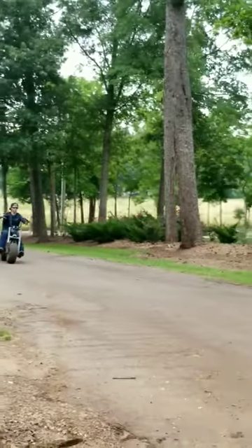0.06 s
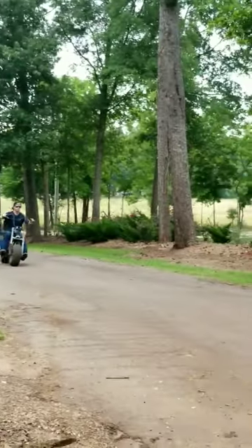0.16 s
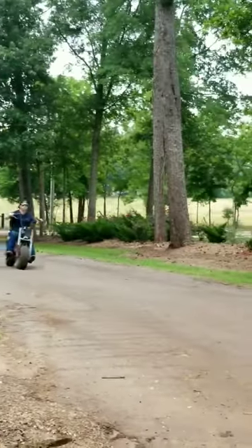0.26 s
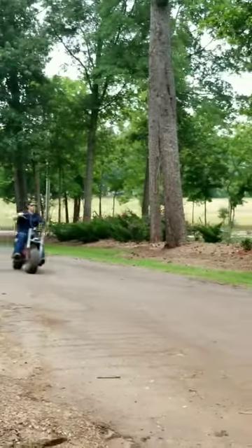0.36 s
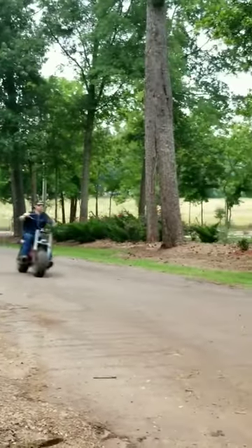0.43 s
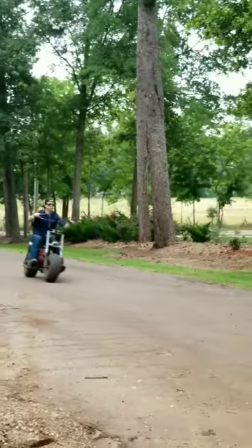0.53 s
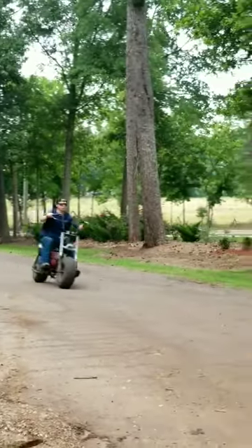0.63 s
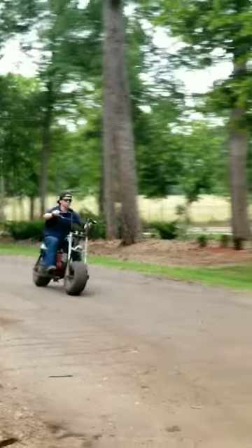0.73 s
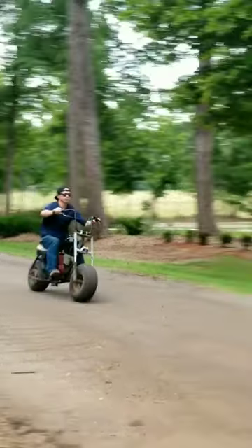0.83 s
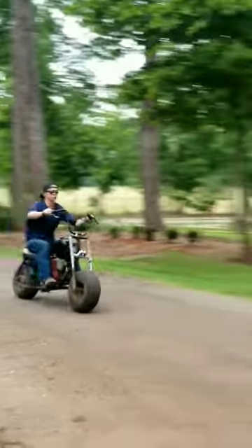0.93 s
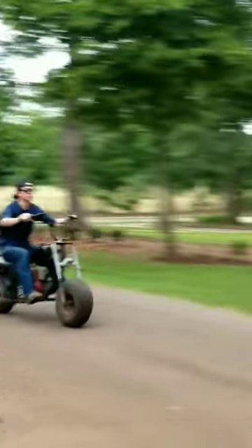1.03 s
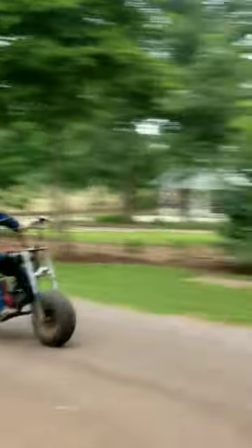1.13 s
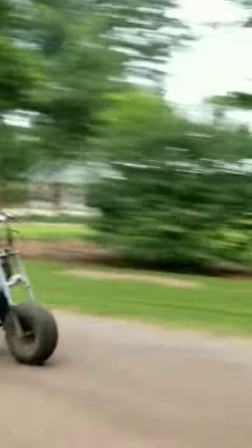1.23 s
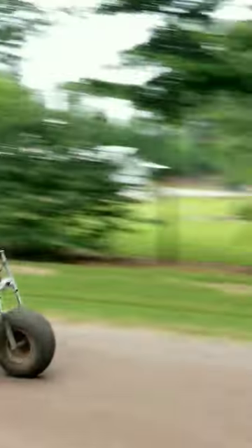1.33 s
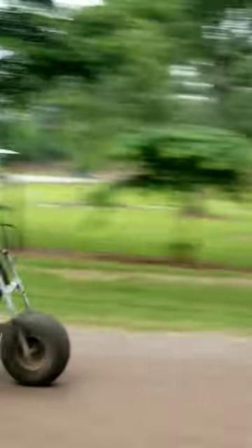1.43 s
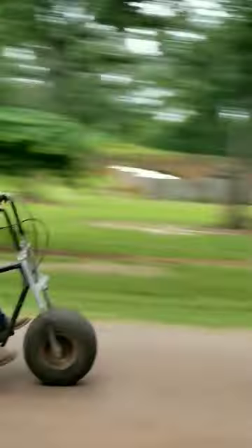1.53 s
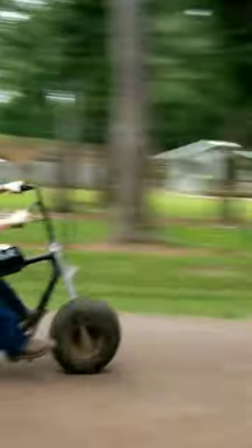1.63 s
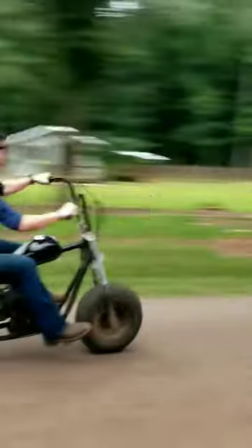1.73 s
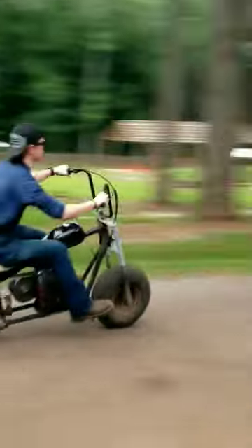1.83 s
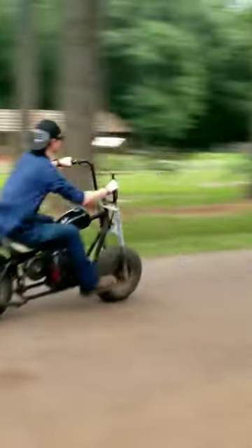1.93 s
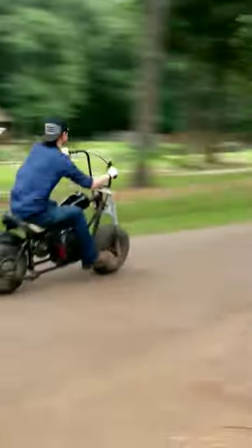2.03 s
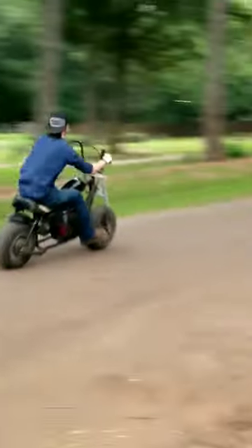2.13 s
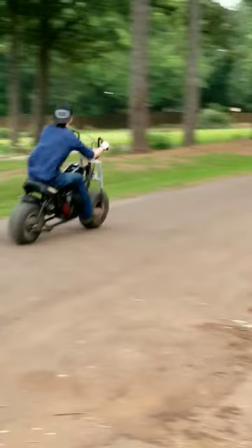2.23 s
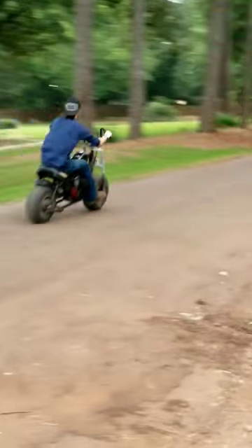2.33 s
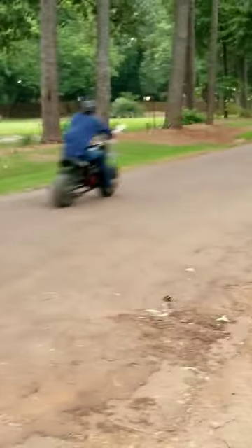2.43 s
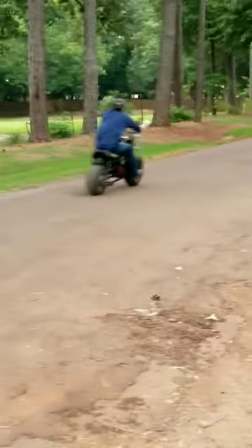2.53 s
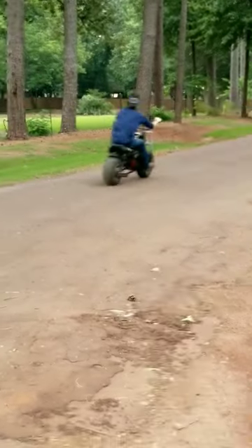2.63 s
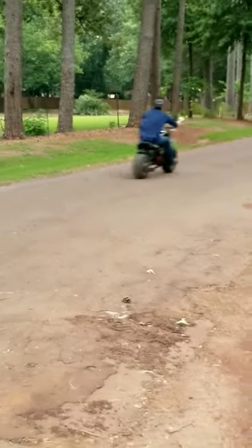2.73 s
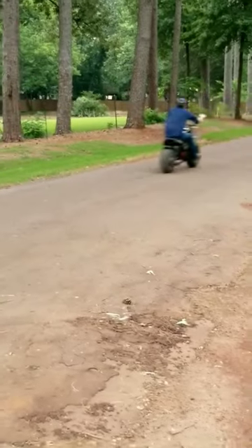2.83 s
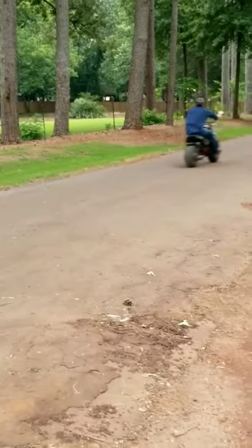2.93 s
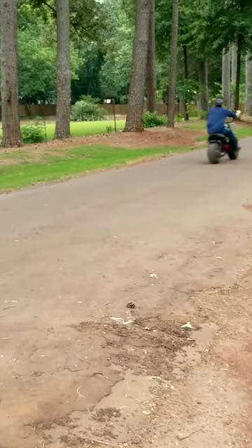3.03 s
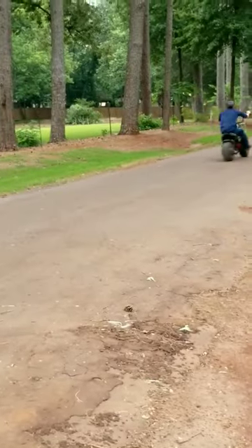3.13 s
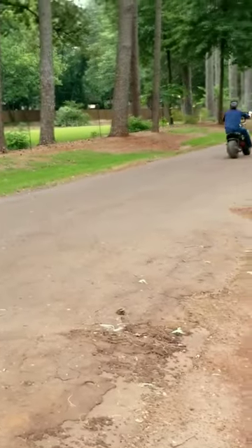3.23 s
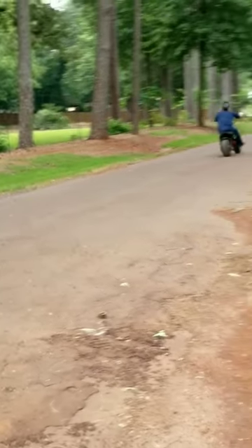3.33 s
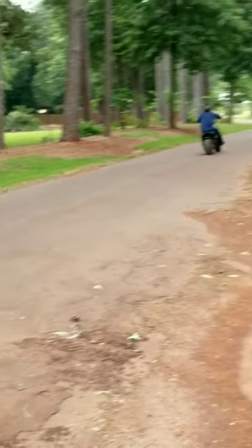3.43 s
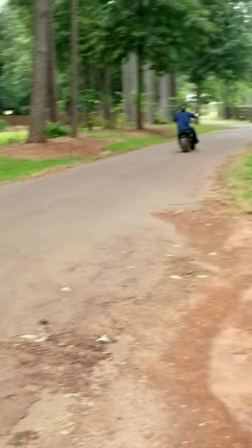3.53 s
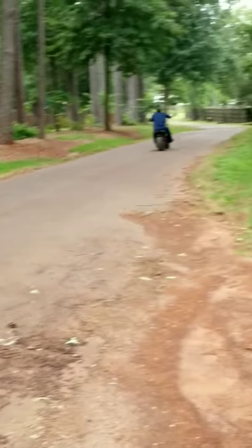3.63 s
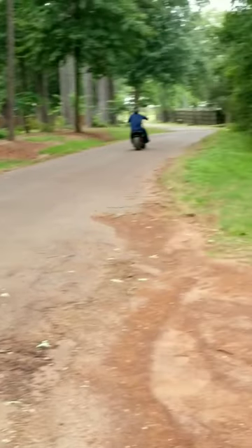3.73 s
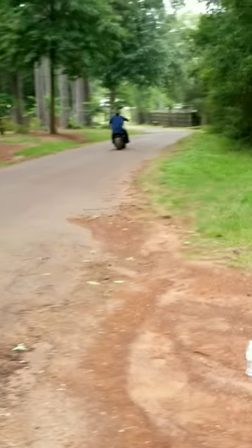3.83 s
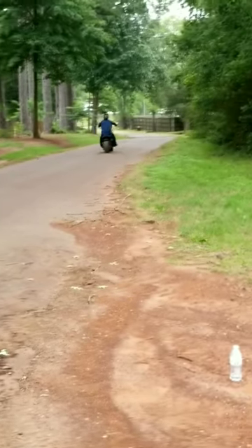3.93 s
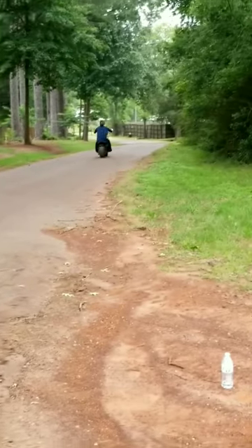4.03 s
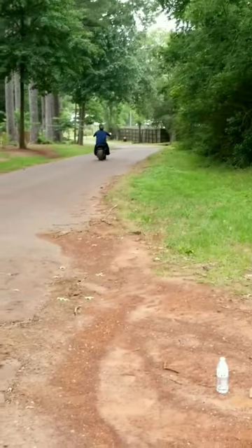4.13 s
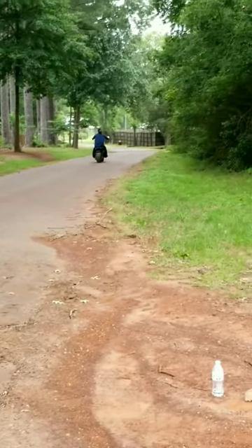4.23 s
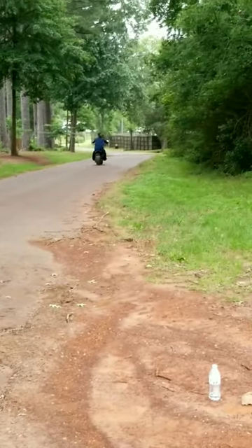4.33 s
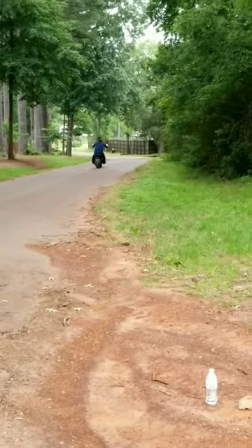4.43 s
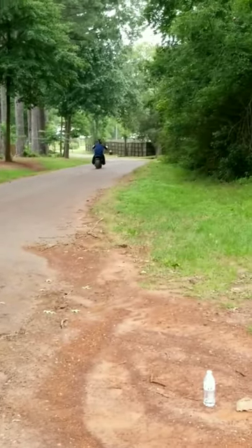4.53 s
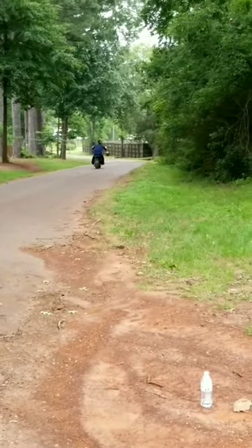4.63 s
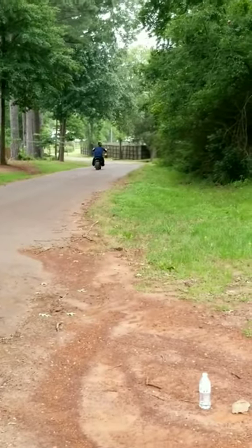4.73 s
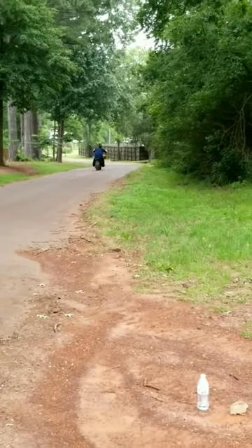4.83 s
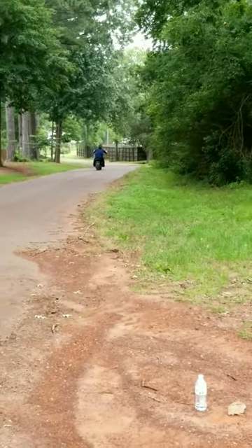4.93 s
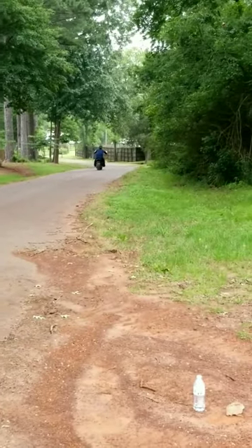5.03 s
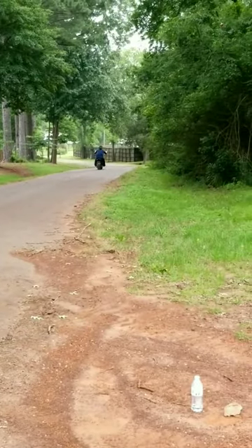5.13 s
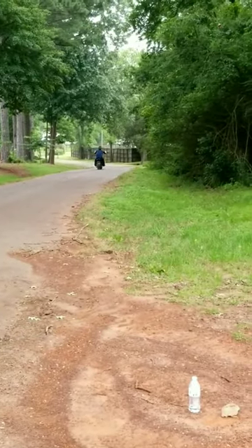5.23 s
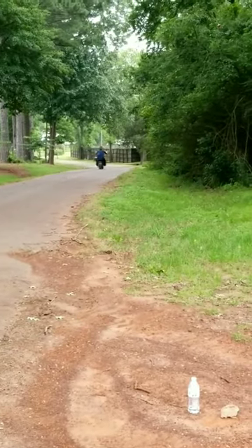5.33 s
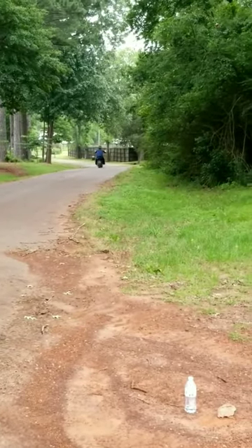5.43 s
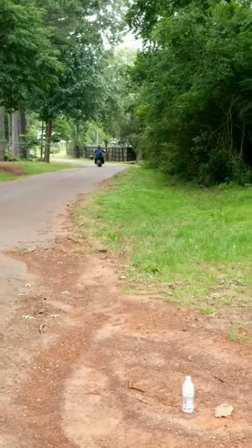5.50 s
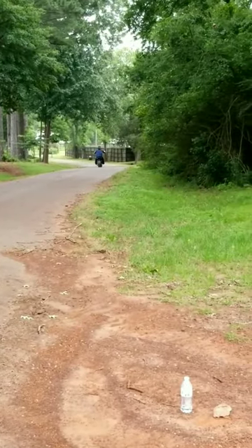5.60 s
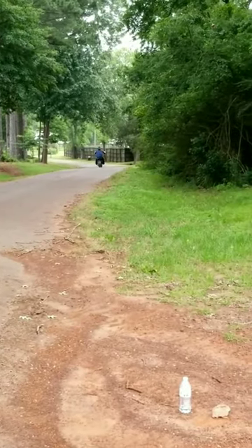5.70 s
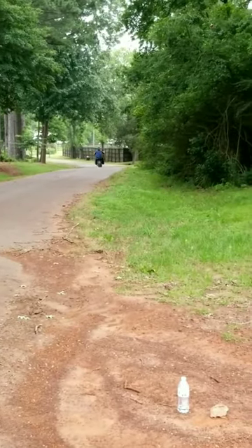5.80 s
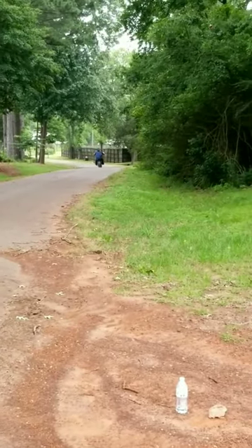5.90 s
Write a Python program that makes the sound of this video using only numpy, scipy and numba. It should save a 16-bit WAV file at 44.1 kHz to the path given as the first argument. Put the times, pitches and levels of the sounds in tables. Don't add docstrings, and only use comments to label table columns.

```python
import sys
import numpy as np
from scipy import signal
from scipy.fft import rfft, irfft
from scipy.io import wavfile
from scipy.ndimage import uniform_filter1d
from numba import njit

SR = 44100
rng = np.random.default_rng(int(sys.argv[2]) if len(sys.argv) > 2 else 0)


def bounce(signal):
    frames = np.transpose(np.atleast_2d(signal))
    limited = np.clip(frames, -1, 1)
    pcm = np.round(limited * 32767).astype(np.int16)
    wavfile.write(sys.argv[1], SR, pcm)


def field_ratio(decibels):
    return 10 ** (np.asarray(decibels, dtype=float) / 20)


N = 262836
NEAREST_S = 1.997


def unit(x):
    return x / np.sqrt(np.mean(x ** 2))


def curves(table):
    s, *columns = np.transpose(table)
    return [np.interp(np.arange(N) / SR, s, c) for c in columns]


def step(at_s, over_s):
    return 0.5 + 0.5 * np.tanh((np.arange(N) / SR - at_s) / over_s / 2)


def bump(at_s, half_s):
    return np.exp(-((np.arange(N) / SR - at_s) / half_s) ** 2)


def walk(rate):
    hold = int(SR / rate)
    levels = np.repeat(rng.standard_normal(N // hold + 1), hold)
    return uniform_filter1d(uniform_filter1d(levels, hold), hold)[:N]


def noise():
    return rng.standard_normal(N)


def delayed(x, delay):
    return np.interp(np.arange(N) - delay, np.arange(N), x)


@njit
def svf(x, hz, width):
    band, low, b, l, g = np.empty(len(x)), np.empty(len(x)), 0., 0., 0.
    for i in range(len(x)):
        if i == 0 or hz[i] != hz[i - 1]:
            g = np.tan(np.pi * hz[i] / SR)
        k = width[i] / hz[i]
        v = (b + g * (x[i] - l)) / (1 + g * (g + k))
        band[i], low[i] = k * v, l + g * v
        b, l = 2 * v - b, l + 2 * g * v
    return band, low


def band_pass(x, hz, width):
    return svf(x, hz + np.zeros(N), width + np.zeros(N))[0]


def ring(x, modes):
    return unit(sum(field_ratio(db) * band_pass(x, hz, wide_hz) for hz, wide_hz, db in modes))


def notch(x, hz, width, depth=1):
    return x - depth * band_pass(x, hz, width)


def dull(x, hz, damping):
    return svf(x, hz + np.zeros(N), damping * hz + np.zeros(N))[1]


def blend(front, rear, facing):
    return np.sqrt(1 - facing) * front + np.sqrt(facing) * rear


def firings():
    # t/s, firing rate f/Hz
    firing = [(0, 32.019), (.4, 31.649), (.8, 32.145), (.99, 31.82), (1.39, 32.176), (1.59, 31.91),
              (1.99, 32.263), (2.18, 32.0), (2.55, 32.213), (2.85, 32.673), (3.0, 32.524), (3.45, 32.646),
              (3.6, 32.982), (4.35, 33.804), (4.5, 34.194), (4.8, 33.874), (5.55, 34.833), (5.96, 34.863)]
    hz, = curves(firing)
    turns = 1.005 + np.cumsum(hz) / SR
    draws = rng.standard_normal((400, 10)).clip(-1.7, 1.7)
    jitter, *chance = draws[turns.astype(int)].T
    return turns, turns % 1 / hz + 0.000087 * jitter, chance


def passing():
    facing = 0.025 + 0.975 * step(1.94, 0.28)
    crack = 0.74 * step(1.88, 0.17) * (1 - 0.89 * step(4.1, 0.62))
    crack = crack + 0.14 * bump(5.03, 0.24) + 0.051 * bump(1.1, 0.23)
    bass_hz = 367.7 + 106 * bump(NEAREST_S - 0.15, 0.51) - 68 * bump(2.97, 0.72)
    edge_hz = 7480 + (3470 - 7480) * bump(NEAREST_S, 0.51)
    gap_open = step(1.39, 0.12) * (1 - step(2.47, 0.025))
    gap_db = -8 + (-52 - -8) * gap_open
    return np.clip(facing, 0, 1), np.clip(crack, 0, 1), bass_hz, edge_hz, gap_db


def pulse(since, size, at_s, width_s):
    return field_ratio(0.76 * size) * np.exp(-((since - at_s) / width_s) ** 2)


def crank_tones(turns):
    crank = [(1, 3.5), (2, 3.5), (3, 3.4), (4, 3.95), (5, 3.5), (6, 2.4), (8, 3.5), (11, 2.6), (12, 4)]
    crank_db = [-21, -5.5, -10, -6, -8.5, 0, -13, -17.5, -6]
    fins_db = -9.5 * bump(0, 0.45)
    tones = 0
    for (multiple, rad), db in zip(crank, crank_db):
        gain = field_ratio(db + fins_db * (multiple > 10) + 0.73 * walk(5.64))
        tones = tones + gain * np.sin(2 * np.pi * multiple * turns + rad)
    return unit(tones)


def case_rumble():
    # f/Hz, width/Hz, level/dB
    case = [(67, 11, -17), (121, 45, 3), (198, 51, 10.5), (226, 77, -3), (377, 19, -16)]
    return 0.48 * ring(noise(), case)


def pipe_thump(blast, lag):
    # f/Hz, width/Hz, level/dB
    pipe_low = [(102, 100, -7), (170.4, 51, 4), (283, 223, -1)]
    pipe = delayed(notch(ring(blast, pipe_low), 74, 75, 0.15), lag)
    slosh = 0.17 * ring(noise(), [(197, 76, 0.75), (315, 220, 1.5)])
    pipe = notch(unit(pipe), 60, 47, 0.45 * bump(1.5, 0.46)) + slosh
    return pipe + field_ratio(-24.5 + 3.7 * walk(11)) * delayed(pipe, 0.01775 * SR)


def body_booms(blast):
    # f/Hz, width/Hz, level/dB, t/s, half width/s
    booms = [
        (138, 25, -11, 2.32, 0.49),
        (382, 18, -11.5, 2.364, 0.32),
    ]
    total = 0
    for hz, wide_hz, db, s, half_s in booms:
        boom = ring(ring(blast, [(hz, 2 * wide_hz, 0)]), [(hz, wide_hz, 0)])
        total = total + field_ratio(db) * bump(s, half_s) * boom
    return total


def road_cancel(x, edge_hz, facing):
    depth = 0.5 + 0.24 * facing - 0.15 * bump(2.56, 0.13) + 0.11 * bump(2.9, 0.57)
    return unit(notch(x, 1.197 * edge_hz, 0.27 * edge_hz, depth))


def engine_thump(turns, since, size, facing, edge_hz):
    blast = pulse(since, size, 0.0008, 0.0004)
    lag = -0.001 * SR * (1 - step(2.64, 0.11))
    front = unit(crank_tones(turns) + case_rumble())
    thump = dull(blend(front, pipe_thump(blast, lag), facing), edge_hz, 0.93)
    thump = road_cancel(thump, edge_hz, facing)
    thump = notch(thump, 198, 40, 0.11 * bump(2.37, 0.58))
    return thump + delayed(body_booms(blast), lag)


def frame_rattle(since):
    # f/Hz, width/Hz, level/dB per Hz of width
    frame = [(545, 350, 5), (718, 180, 3), (860, 120, -8.5), (1280, 430, -1), (1570, 170, -14)]
    rattle = field_ratio(2.0 * walk(60)) * (1 + 0.1 * np.exp(-since / 0.00086)) * noise()
    moving_db = -2.5 * bump(2.28, 0.36) + 3.8 * bump(1.27, 0.21)
    total = 0
    for mode in frame:
        db = mode[2] + 10 * np.log10(mode[1]) + 1.0 * walk(14.46) + moving_db
        total = total + field_ratio(db) * ring(rattle, [mode])
    return unit(total)


def pipe_mouth(since, size):
    # f/Hz, width/Hz, level/dB
    pipe_high = [(648, 290, -1.5), (770, 150, -5), (1202, 170, -6)]
    ragged = 1 + 0.4 * noise()
    snap = pulse(since, size, 0.0015, 0.00022) * ragged
    return unit(field_ratio(1.7 * walk(30)) * notch(ring(snap, pipe_high), 973, 106))


def engine_bark(since, size, facing, edge_hz):
    bark = blend(frame_rattle(since), pipe_mouth(since, size), 0.92 * step(2.64, 0.11))
    bark = dull(dull(bark, 2900, 3.26), 5800, 1.0)
    return road_cancel(bark, edge_hz, facing)


def trees(x):
    s = np.arange(SR // 2) / SR
    t60_s = 0.95
    tail = rng.standard_normal(len(s)) * field_ratio(-60 * s / t60_s) * np.clip(s / 0.011, 0, 1)
    tail = signal.lfilter([1], [1, -0.7], tail)
    return signal.fftconvolve(x, tail / np.sqrt(np.sum(tail ** 2)))[:N]


def breeze():
    return field_ratio(-48 + 2.5 * walk(19)) * ring(noise(), [(29, 35, 0)])


def gas_puff(since):
    opened = np.clip(since - 0.0009, 0, 1)
    return (1 - np.exp(-opened / 0.0022)) * np.exp(-(opened / 0.0029) ** 2.27)


def gas_band(puff, chance, drift, crack):
    clatter = unit(field_ratio(3.27 * walk(150) + 0.33 * walk(14)))
    puffs = unit(field_ratio(0.12 * chance + 3.05 * drift + 1.14 * walk(6.17)) * puff)
    return blend(clatter, puffs, 0.99 * crack) * noise()


def whistles(puff, chance, crack, sheen):
    pitch_hz = np.clip(3900 / sheen * np.exp(0.47 * chance[1]), 2580, 7600)
    narrow = unit(band_pass(puff * field_ratio(1.6 * chance[0]) * noise(), pitch_hz, 0.07 * pitch_hz))
    other_hz = np.clip(4500 * np.exp(0.383 * chance[3]), 1900, 7600)
    other = unit(band_pass(puff * field_ratio(3.0 * chance[4]) * noise(), other_hz, 220))
    return crack * (0.5 * narrow + 0.36 * other)


def pipe_rings(puff, chance):
    # f/Hz, width/Hz, level/dB, t/s, half width/s
    rings = [(1325, 130, -8.5, 3.63, 0.56), (2620, 160, -12, 3.37, 0.4), (2180, 190, -27, 2.28, 0.1),
             (3150, 340, -17, 4, 0.14), (3250, 360, -13.5, 5.1, .3), (7300, 540, -14, 5.3, .3),
             (3950, 390, -8.5, 5.77, 0.18), (1350, 270, -10.5, 5.75, 0.11)]
    total = field_ratio(-6) * bump(3.98, 0.51) * ring(puff * noise(), [(2610, 300, 0)])
    for (hz, wide_hz, db, s, half_s), c in zip(rings, chance[::-1]):
        tone = ring(puff * noise(), [(hz, wide_hz, 0)])
        total = total + field_ratio(db + 3.0 * c) * bump(s, half_s) * tone
    return total


def road_comb(gas, edge_hz, gap_db):
    dip_hz = 920 + 2500 * np.clip(np.arange(N) / SR - 2.186, 0, 3)
    dip_depth = 0.89 * step(2.186, 0.037) * (1 - step(3.37, 0.11))
    gas = notch(gas, dip_hz, 0.2 * dip_hz, dip_depth)
    gas = gas + 1.33 * band_pass(gas, 0.988 * edge_hz, 0.13 * edge_hz)
    gas = dull(dull(gas, edge_hz, 1.0), 1.185 * edge_hz, 1.78)
    return notch(gas, 9000, 1800, np.clip(-gap_db / 40, 0, 1))


def hiss(since, lift, chance, crack, edge_hz, gap_db, hiss_db, fizz_db):
    # f/Hz, width/Hz, level/dB per Hz of width
    gas_modes = [(1405, 168, 4), (2000, 170, 0), (2910, 1300, 2), (4730, 1430, 1), (6600, 2700, 0.5)]
    # t/s, half width/s, level of the lower bands/dB
    sheen_table = [
        (0, 0.79, 3),
        (2.75, 0.46, -2),
        (4.15, 0.89, 1.5),
        (5.4, 0.15, -0.5),
    ]
    puff = gas_puff(since) * lift
    *low, high = (gas_band(puff, chance[0], c, crack) for c in chance[2:])
    sheen = field_ratio(sum(db * bump(s, half_s) for s, half_s, db in sheen_table))
    low = [x * sheen for x in low[:3]] + low[3:]
    gas = 0
    for x, mode in zip(low, gas_modes):
        gas = gas + ring(x, [mode]) * field_ratio(mode[2] + 10 * np.log10(mode[1]))
    gas = unit(gas) + whistles(puff, chance, crack, sheen) + pipe_rings(puff, chance)
    gas = road_comb(gas, edge_hz, gap_db)
    filled = field_ratio(gap_db + 1.65 * walk(30)) * ring(low[-1] + high, [(10000, 8000, 0)])
    fizz = ring(ring(high, [(15500, 11500, 0)]), [(13800, 45000, 0)])
    fizz = notch(fizz, 5200, 2300)
    fizz = notch(fizz, 6500, 2000, np.clip(-gap_db / 45, 0, 1))
    both = field_ratio(hiss_db) * (unit(gas) + filled) + field_ratio(fizz_db) * unit(fizz)
    hollow_hz = 8800 * (1 + 0.081 * walk(34.92))
    return notch(both, hollow_hz, 4260, np.clip(-gap_db / 45 - 0.15, 0, 1))


def cracks(turns):
    # t/s, peak level/dB, f/Hz
    pipe_cracks = [(2.0952, -17, 2870), (2.1581, -10, 3500), (2.2209, -17, 4280), (2.2514, -44, 2640),
                   (2.3142, -17, 4420), (2.3447, -9, 2710), (2.3771, -12, 4800), (2.408, -13, 5650),
                   (2.4389, -7, 4410), (2.4704, -11, 5930), (2.5018, -4, 6320), (2.5642, -18, 6050),
                   (2.626, -19, 4560), (2.657, -14, 4080), (2.6874, -22, 4260), (2.7183, -17, 4550),
                   (2.7802, -5, 4800), (2.872, -11, 7320), (2.9024, -15, 4900), (2.9638, -9.5, 5400),
                   (2.9947, -7, 6880), (3.0251, -15, 4300), (3.056, -21, 4400), (3.1793, -15, 6860),
                   (3.2092, -20, 2610), (3.2716, -18.5, 2640), (3.3015, -9, 6320), (3.3324, -11, 6850),
                   (3.3633, -17, 6000), (3.3933, -16.5, 2800), (3.4551, -16.5, 2660), (3.5774, -17.5, 2470),
                   (3.6073, -13.5, 3280), (3.8487, -12, 2620), (3.9091, -9.5, 2540), (3.9989, -14, 3810),
                   (4.0583, -10, 2430), (4.8255, -4, 3100), (5.2361, -7, 7000), (5.3229, -18, 7390)]
    # t/s, peak level/dB, f/Hz
    more_cracks = [(4.0884, -20, 7200), (4.1178, -21, 2620), (4.2964, -20, 2500), (4.4151, -13, 2640),
                   (4.4735, -12, 7650), (4.5024, -13, 4120), (4.5318, -18, 5400), (4.6196, -27, 7610),
                   (4.7374, -16, 4220), (4.7668, -16, 7110), (4.7962, -17, 5170), (4.8257, -12.5, 3080),
                   (4.8551, -14, 3120), (4.9733, -31, 4600), (5.0028, -17, 3250), (5.0317, -15, 2000),
                   (5.0611, -14, 7450), (5.0906, -15, 4870), (5.119, -15, 6750), (5.1489, -16, 7460),
                   (5.2362, -12, 7100), (5.2647, -11, 7320), (5.3231, -8, 7330), (5.351, -14, 4730),
                   (5.3809, -16, 6000), (5.7541, -15, 3240)]
    cycle = turns.astype(int)
    db, hz = np.full(400, -99.), np.full(400, 3000.)
    s, db_at, hz_at = np.transpose(list(pipe_cracks) + list(more_cracks))
    at = cycle[((s + 0.006) * SR).astype(int)]
    db[at], hz[at] = db_at, hz_at
    return db[cycle], hz[cycle]


def ping(since, crack_db, crack_hz):
    tone = np.sin(2 * np.pi * crack_hz * since + 0.82 * walk(1500))
    return field_ratio(crack_db + 3) * gas_puff(since) * tone


def scene():
    # t/s, level/dB
    level = [(0.0, -23.5), (0.23, -23), (0.58, -21.5), (0.68, -22), (0.73, -21), (0.94, -19), (0.98, -19),
             (1.21, -20.5), (2.11, -17), (2.37, -25.5), (3.07, -27), (3.12, -26.5), (3.39, -29.5),
             (4.26, -26), (5.26, -27), (5.56, -25.5), (5.94, -26.5), (5.96, -26)]
    t = np.arange(N) / SR
    turns, since, (size, *chance) = firings()
    level_db, = curves(level)
    facing, crack, bass_hz, edge_hz, gap_db = passing()

    bark_db = level_db - 3.5 - 2 * bump(2.88, 0.88)
    thump = engine_thump(turns, since, size, facing, bass_hz)
    bark = engine_bark(since, size, facing, bass_hz)
    body = field_ratio(level_db + 1.32) * thump + field_ratio(bark_db) * bark
    body = body + field_ratio(-19) * trees(body) + breeze() * field_ratio(0.68 * (level_db + 22.0))

    hiss_db = level_db - 3 - 2 * (1 - step(1.0, 0.16))
    hiss_db = hiss_db + 5 * bump(NEAREST_S + 0.11, 0.88) - 9.5 * bump(NEAREST_S, 0.12)
    lost_db = np.clip(np.maximum(14 * (0.66 - t), 3 * (t - 2.3)), 0, 8)
    fizz_db = level_db - 1 - 10.5 * bump(NEAREST_S - 0.08, 0.35) - lost_db
    crack_db, crack_hz = cracks(turns)
    lift = field_ratio(0.39 * np.clip(crack_db + 21 - level_db - 25, 0, 9))
    air = hiss(since, lift, chance, crack, edge_hz, gap_db, hiss_db, fizz_db)
    air = air + ping(since, crack_db, crack_hz)

    stray = hiss(since, lift, chance, crack, np.full(N, 7500.), -66,
                 0.47 * level_db - 23.0, level_db - 21.0)
    muffled = body + 0.034 * air + stray + 0.12 * trees(body)
    return np.array([body + air, muffled])


def top_cut(x):
    return signal.sosfilt(signal.butter(12, 15940, fs=SR, output="sos"), x)


def record(dry):
    # f/Hz, level/dB, phase/rad
    hand = [(40, -2.5, 0.68), (405, -0.5, -0.98), (504, -14.5, -1.35), (900, -6.5, -0.47),
            (1280, -12.5, -2.07), (3970, -14, -0.85), (7200, -113, -1.1), (12900, -56, -1.1)]
    log_hz = np.log(np.maximum(np.arange(N // 2 + 1) * SR / N, 1))
    at, db, rad = np.transpose(hand)
    gain = field_ratio(np.interp(log_hz, np.log(at), db))
    muffle = gain * np.exp(1j * np.interp(log_hz, np.log(at), rad))
    x = np.array([dry[0], irfft(rfft(dry[1]) * muffle, N)])
    x = signal.sosfilt(signal.butter(2, 55, "high", fs=SR, output="sos"), x)
    x = np.tanh(0.58 * x) / 0.62
    x = signal.sosfilt(signal.ellip(10, 0.5, 70, 14510, fs=SR, output="sos"), x)
    return top_cut(x)


dry = scene()
out = record(dry)
bounce(out)
```